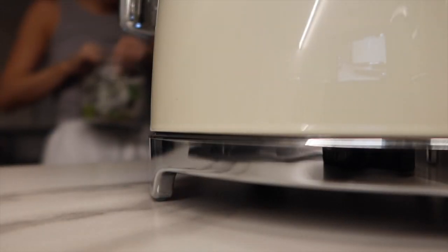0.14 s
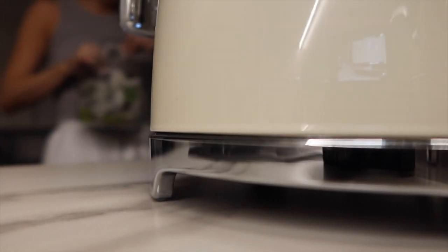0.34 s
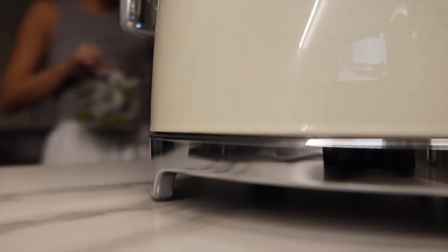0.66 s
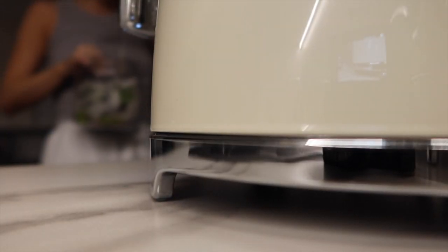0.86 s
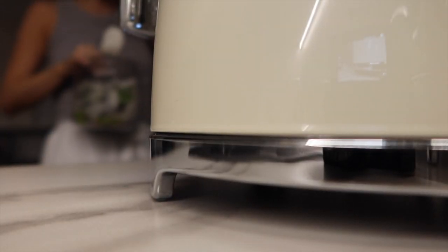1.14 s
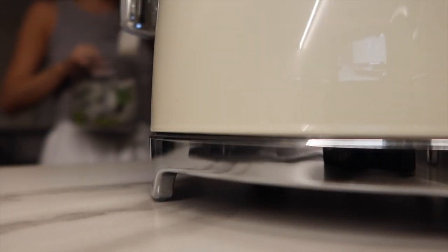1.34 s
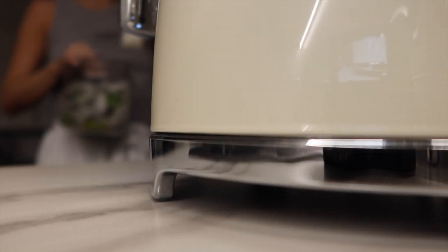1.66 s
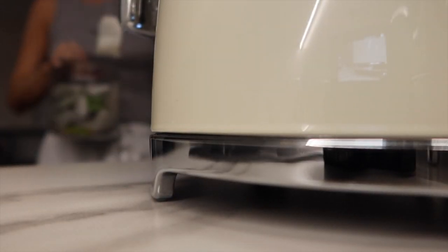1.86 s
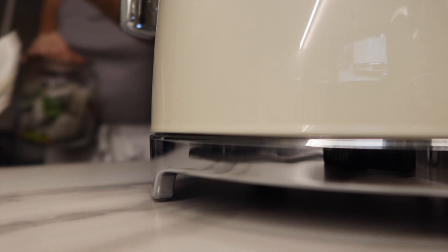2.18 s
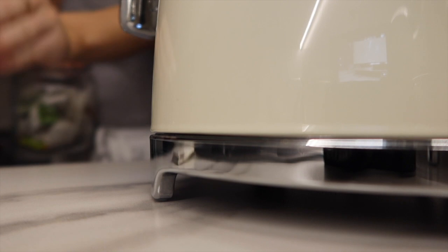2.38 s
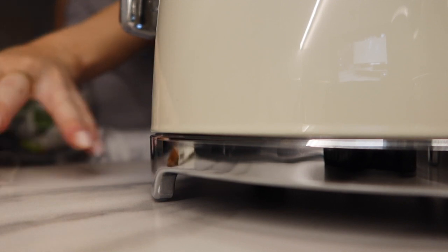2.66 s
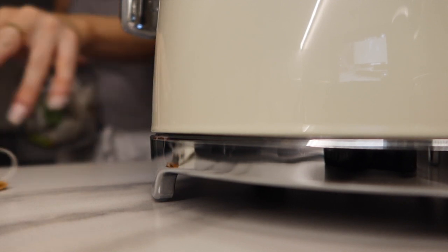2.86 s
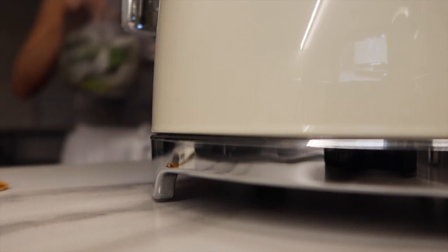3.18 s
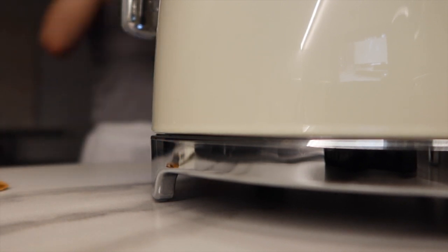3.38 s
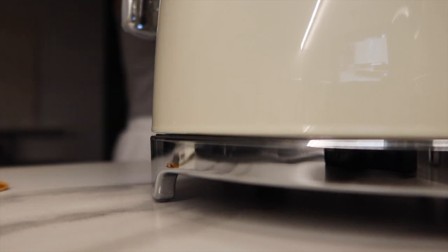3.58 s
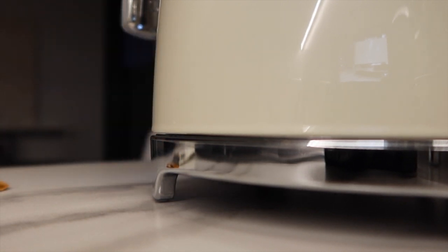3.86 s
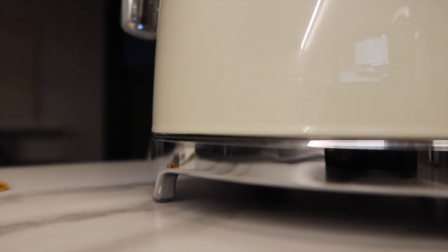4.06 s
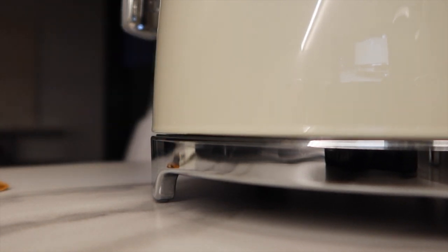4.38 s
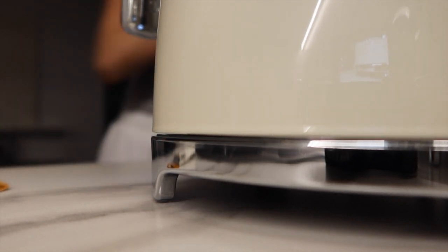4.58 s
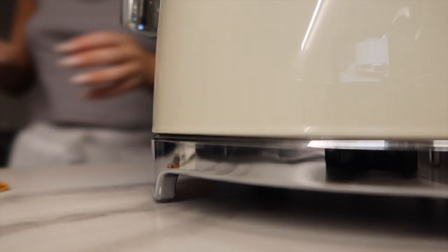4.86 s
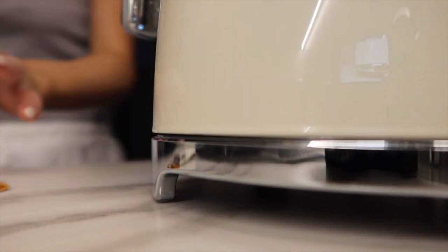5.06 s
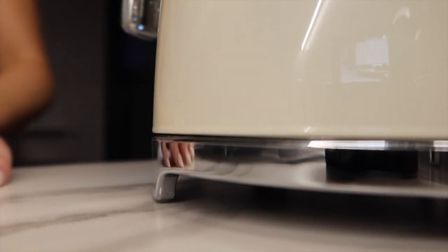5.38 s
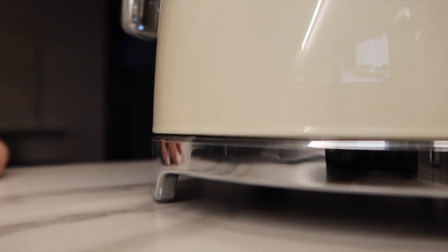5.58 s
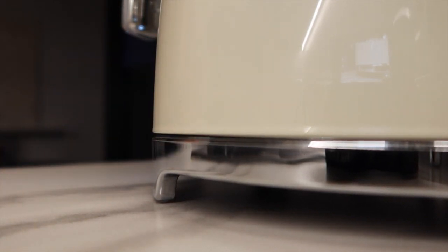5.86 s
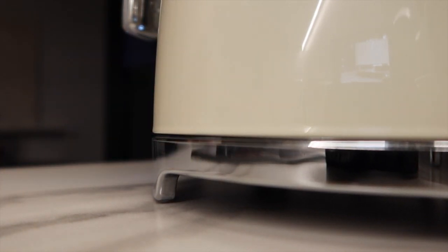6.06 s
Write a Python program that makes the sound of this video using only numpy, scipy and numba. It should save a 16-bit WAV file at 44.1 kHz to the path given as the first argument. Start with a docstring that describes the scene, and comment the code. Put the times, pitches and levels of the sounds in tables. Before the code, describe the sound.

An electric kettle heats water close to the microphone in a quiet, hard-walled kitchen. Its low, seething roar runs for the whole six seconds, with faint crackles and tiny pings against the steel wall. Right at the start, a thin glass gives a quick, ringing clink. Small dry ticks are scattered throughout, the clearest at about 0.4, 1.9 and 2.4 seconds. At about 4 seconds, a glass jar lands on a cupboard shelf with a loud clink, a thump and a brief rattle. Immediately afterward, around 4.2 seconds, the wooden door knocks shut and judders, with a short room echo. The roar dips briefly under these knocks. From 4.5 seconds, larger bubbles thud softly as the water nears the boil. Between about 5 and 6 seconds, a hand moves things nearby with faint rustles and a cluster of light taps, while the kettle keeps rumbling.

```python
"""An electric kettle roars towards the boil on a stone counter, close by in a quiet kitchen.
Steam bubbles collapse on the hot plate, shake the steel body and ping its wall. A thin glass clinks,
small things tick, a glass jar lands in a cupboard whose door knocks shut, and a hand rustles nearby.
The microphone's gain control ducks under the blows."""
import sys
import numpy as np
from scipy import signal
from scipy.fft import rfft, irfft, next_fast_len
from scipy.io import wavfile
from scipy.ndimage import uniform_filter1d, minimum_filter1d
from numba import njit

SR = 44100
rng = np.random.default_rng(int(sys.argv[2]) if len(sys.argv) > 2 else 0)


def waveform_to_disk(signal):
    """Save audio, clipped to [-1, 1], as 16-bit WAV at the path in sys.argv[1]."""
    frames = np.transpose(np.atleast_2d(signal))
    scaled = np.clip(frames, -1, 1) * 32767
    samples = np.round(scaled).astype(np.int16)
    wavfile.write(sys.argv[1], SR, samples)


N = 274369
TIME_S = np.arange(N) / SR


def undb(db):
    return 10 ** (np.asarray(db) / 20)


def at_rms(x, db):
    return x * undb(db) / np.sqrt(np.mean(x ** 2))


def butter(x, order, hz, kind="low"):
    return signal.sosfilt(signal.butter(order, hz, kind, fs=SR, output="sos"), x)


def band(x, hz, width_hz):
    """One resonance, unity gain at the centre."""
    return signal.lfilter(*signal.iirpeak(min(hz, .45 * SR), hz / width_hz, fs=SR), x)


def steep_band(x, hz, width_hz):
    return band(band(x, hz, width_hz), hz, width_hz)


def ring(x, modes):
    """Damped modes excited by x."""
    out = 0
    for hz, db, t60_s in modes:
        r, w = np.exp(-np.log(1000) / (t60_s * SR)), 2 * np.pi * hz / SR
        out = out + undb(db) * signal.lfilter([0, r * np.sin(w)], [1, -2 * r * np.cos(w), r * r], x)
    return out


def blows(hits, contact_ms):
    """A short rough force pulse at each (t/s, level/dB)."""
    force, n = np.zeros(N), max(int(contact_ms * SR / 1000), 2)
    for (s, db), rough in zip(hits, rng.standard_normal((len(hits), 256))):
        i = int(s * SR)
        force[i:i + n] += undb(db) * np.hanning(n + 2)[1:-1] * (1 + 0.16 * rough[:n]) * 2 / n
    return force


def wander(per_s):
    """Random steps, smoothed twice."""
    hold = int(SR / per_s)
    steps = np.repeat(rng.standard_normal(N // hold + 1), hold)
    return 1.08 * uniform_filter1d(uniform_filter1d(steps, hold), hold)[:N]


def clicks(per_s, scatter_db):
    """Random impulses of either sign, a few much larger than the rest; unit RMS."""
    chance, sign, size = rng.random((N, 3)).T
    height = undb(scatter_db * np.minimum(-np.log(1 - size), 6))
    return at_rms((chance < per_s / SR) * np.sign(sign - .5) * height, 0)


def swell(peak_s, db, rise_db_per_s, fall_db_per_s):
    t = TIME_S - peak_s
    return undb(db + np.where(t < 0, rise_db_per_s * t, -fall_db_per_s * t))


def minimum_phase(db):
    """Impulse response for a gain curve on an rfft grid."""
    cepstrum = irfft(db * np.log(10) / 20)
    half = len(cepstrum) // 2
    cepstrum[1:half] *= 2
    cepstrum[half + 1:] = 0
    return irfft(np.exp(rfft(cepstrum)))


# One collapse through water and base: f/Hz, level/dB
COLLAPSE_SPECTRUM = [(15, -72.5), (25, -39), (99, -14.5), (221, -5.5), (305, -0.5), (349, -7), (469, -13),
                     (536, -25), (647, -25.5), (781, -32.5), (1200, -36.5), (1950, -40), (2420, -43.5),
                     (13200, -76.5), (15500, -85.5)]
# Filled kettle: f/Hz, width/Hz, gain/dB
KETTLE_RESONANCES = [(102.6, 30, 5.5), (162, 29, 4.5), (260, 33, 2), (313, 44, 2.5), (384, 35, 5.5),
                     (464.7, 23.7, 7), (643, 33, 4), (1178, 220, 6), (1616, 320, 7.5), (1934, 71, 7),
                     (3900, 290, 3), (6100, 110, -2), (12000, 4600, 11)]


def kettle_body():
    """Response of the filled steel body to one bubble collapse."""
    hz = np.maximum(np.fft.rfftfreq(16384, 1 / SR), 1)
    knot_hz, knot_db = np.array(COLLAPSE_SPECTRUM).T
    db = np.interp(np.log(hz), np.log(knot_hz), knot_db)
    db += sum(gain / (1 + (2 * (hz - f) / width) ** 2) for f, width, gain in KETTLE_RESONANCES)
    return minimum_phase(np.maximum(db, -120))


# Bubble swarms, large to small: rate/(1/s), size scatter/dB, seethe/dB, seethe rate/(1/s)
SWARMS = [(2046, 1.5, 0.8, 16), (557.3, 2, -0.5, 22), (4000, 3, 1.18, 24), (4980, 1, 2.1, 32),
          (7200, 1.5, 2.2, 39)]
# Edges of the swarms' bands: f/Hz
SWARM_EDGES_HZ = [15, 170, 700, 2300, 6500, 16500]
# Biggest single bubbles: t/s, level/dB
BUBBLE_THUDS = [(4.513, -5), (4.66, -7), (4.875, -4.5), (4.912, -2.5), (5.063, -3), (5.128, -3),
                (5.227, 2.5), (5.274, -3), (5.308, -2), (5.426, -8), (5.705, -4), (5.882, -4.5)]


def kettle_roar(start_db=-14.5, sag_db_per_s=0.32, mid_sag_db_per_s=0.28, large_grow_db_per_s=1.79):
    """Swarms of collapses drive the body; near the boil the roar eases and large bubbles grow."""
    body, drive = kettle_body(), 0
    for k, (per_s, scatter_db, seethe_db, seethe_per_s) in enumerate(SWARMS):
        swarm = clicks(per_s, scatter_db)
        gain_db = seethe_db * (wander(seethe_per_s) + wander(seethe_per_s / 2))
        if k == 2:  # mid-sized bubbles fade faster
            gain_db -= mid_sag_db_per_s * (TIME_S - N / 2 / SR)
        drive += butter(swarm * undb(gain_db), 3, SWARM_EDGES_HZ[k:k + 2], "band")
    large_band_hz = SWARM_EDGES_HZ[1:3]
    large = clicks(per_s=60, scatter_db=1.8) * undb(-18.5 + large_grow_db_per_s * TIME_S)
    drive += butter(large, 3, large_band_hz, "band")
    roar = at_rms(signal.fftconvolve(drive, body)[:N], start_db) * undb(-sag_db_per_s * TIME_S)
    thud = butter(body, 3, large_band_hz, "band")
    thuds = signal.fftconvolve(blows(BUBBLE_THUDS, contact_ms=1.93), thud / np.abs(thud).max())[:N]
    return roar + thuds


def kettle_crackle():
    """Stray larger bubbles snap against the wall, each a short dull ping."""
    bands = [(1190, 130, -57), (2820, 200, -61), (4800, 390, -70), (9000, 4600, -78.5)]
    return sum(at_rms(band(clicks(50, 1.5), hz, width_hz), db) for hz, width_hz, db in bands)


# Hiss returning from all sides: f/Hz, width/Hz, level/dB
HISS_BANDS = [(35, 40, -77.5), (300, 300, -53.5), (1200, 1200, -72.5), (4000, 2000, -64),
              (5700, 1500, -73.5), (10500, 7000, -79.5)]


def diffuse_hiss(flicker_db=1.2):
    """Noise bands, each flickering on its own."""
    return sum(at_rms(steep_band(rng.standard_normal(N), hz, width_hz), db)
               * undb(flicker_db * wander(per_s=22)) for hz, width_hz, db in HISS_BANDS)


# Thin glass: f/Hz, level/dB, t60/s
GLASS_MODES = [(2140, -7, 0.13), (2200, -4, 0.25), (2250, -8.5, 0.14), (3500, -22.5, 0.092),
               (6330, -18, 0.14), (6380, -21.5, 0.09), (7420, -23, 0.092), (8200, -23.5, 0.05),
               (9450, -20.5, .04), (12380, -22, .05), (13050, -22.5, 0.055), (14590, -18, .05)]
# Blows on it: t/s, level/dB
GLASS_HITS = [(0.004, 3), (.044, -2), (.125, -5.5)]


def thin_glass(gain_db=-29.5):
    """Three weakening blows ring the glass, with a brief noisy shimmer."""
    shake = np.exp(-TIME_S / 0.036) * rng.standard_normal(N)
    force = blows(GLASS_HITS, contact_ms=.05) + 0.056 * shake
    shimmer = undb(-8) * band(shake, 10500, 7000)
    return undb(gain_db) * (ring(force, GLASS_MODES) + shimmer)


# Taps on counter and kettle: t/s, level/dB, f/Hz, relative overtone/dB, relative snap/dB
TAPS = [(0.408, -12, 3500, -7.5, -4.5), (0.4108, -29, 2280, -9, -16.5), (0.417, -40, 3600, -10, -5.5),
        (0.581, -26.5, 1970, -8, -14.5), (0.847, -29, 1170, -7.5, -21.5), (1.3988, -25, 1000, -7, -24.5),
        (1.712, -40.5, 4600, -10, -13.5), (1.843, -38.5, 3700, -12.5, -15), (1.933, -10.5, 3400, 1, -6.5),
        (1.9352, -16, 2280, -5.5, -22), (2.3075, -38.5, 3040, -13.5, 7), (2.429, -17.5, 1190, -3, -32),
        (2.7197, -36, 3400, -6.5, 7), (2.8116, -21.5, 1590, -13.5, -29), (3.619, -23.5, 2800, 4, -10),
        (4.435, -23, 1000, -5, -23.5), (4.518, -28, 1207, -10, -25), (4.576, -38.5, 4500, -15, 3.5),
        (5.1943, -25, 1420, -7.5, -26), (5.258, -37.5, 2900, -16, -25), (5.2766, -28.5, 2620, -10, -32),
        (5.328, -29.5, 2640, -12, 18.5), (5.336, -39, 5000, -15, 21.5), (5.394, -25, 2860, -19.5, -24),
        (5.396, -24.5, 1000, -5.5, -26), (5.605, -20.5, 1150, 2, -21), (5.607, -28.5, 2800, -6, -13),
        (5.66, -25.5, 2330, -17, -29.5), (5.716, -44, 3400, -17, -24), (5.793, -32, 2700, -15.5, -10),
        (5.833, -35.5, 3500, -12, -14), (5.979, -32, 2400, -13, -25), (6.086, -27, 1220, -10, -15)]


def ticks(faint_count=36, ring_cycles=43, smear_s_per_db=0.0028, snap_t60_s=0.0089):
    """Dry taps plus faint random ones: a noise band, its overtone, a bright snap and a glassy ring."""
    faint = [(when * N / SR, -41.5 + 2 * (2 * size - 1), 2800 * 2 ** (pitch - .5), -16.5, -21)
             for when, size, pitch in rng.random((faint_count, 3))]
    n = 4096
    out, t = np.zeros(N + n), np.arange(n) / SR
    for s, db, hz, overtone_db, snap_db in TAPS + faint:
        noise = rng.standard_normal(n)
        softer_db = max(-11 - db, 0)  # fainter, further taps smear longer and ring duller
        t60_s = ring_cycles / hz + smear_s_per_db * softer_db
        contact = 3.2 * np.sqrt(2) * np.sin(2 * np.pi * hz * t) * (hz * t < 1)  # one clean cycle
        push = (noise + contact) * undb(-60 * t / t60_s) * np.minimum(t / 0.00058, 1)
        tone = band(band(push, hz, 0.5 * hz), hz, 0.31 * hz)
        tone += undb(overtone_db) * steep_band(push, 1.67 * hz, 0.24 * hz)
        snap = band(band(noise, 12000, 5100), 13500, 7000) * undb(snap_db - 60 * t / snap_t60_s)
        glassy = np.sin(2 * np.pi * 5760 * t) * undb(-31 - 2 * softer_db - 60 * t / .1)
        i = int(s * SR)
        out[i:i + n] += undb(db) * (tone / np.abs(tone).max() + snap + glassy)
    return out[:N]


# Single bubbles on the steel wall: t/s, level/dB, f/Hz
WALL_PINGS = [(.679, -44, 2900), (1.362, -36.5, 2940), (1.843, -29.5, 2900), (2.088, -42, 2900),
              (2.506, -32.5, 2270), (2.811, -45, 4800), (2.956, -40, 2930), (3.045, -39.5, 2960),
              (3.268, -32.5, 2930), (3.428, -42.5, 3780), (3.541, -40.5, 2980), (4.837, -33, 2270),
              (5.065, -40, 2400)]


def kettle_pings(t60_s=.035, attack_s=.0012):
    """Each bubble rings the wall on one clear pitch."""
    n = 4096
    out, t = np.zeros(N + n), np.arange(n) / SR
    for s, db, hz in WALL_PINGS:
        envelope = undb(db - 60 * t / t60_s) * np.minimum(t / attack_s, 1)
        i = int(s * SR)
        out[i:i + n] += envelope * np.sin(2 * np.pi * hz * t)
    return out[:N]


# Glass jar: f/Hz, level/dB, t60/s
JAR_MODES = [(783, 4, 0.04), (1034, -7.5, 0.031), (1550, -7.5, 0.057), (2138, -2.5, 0.082),
             (2165, -4.5, 0.045), (3247, -5, 0.11), (3204, -6, 0.052), (3960, -2.5, 0.029),
             (4060, -13, .03), (4340, -15, 0.033), (4570, -22.5, .04), (5000, -22.5, 0.05),
             (5100, -20.5, 0.091), (2660, -18.5, .03), (3600, -17.5, .03), (6800, -42, 0.032)]
# Jar landing and rocking: t/s, level on glass/dB, level on shelf/dB
JAR_CONTACTS = [(3.9600, -14, 4), (3.9632, 14.5, 3.5), (3.9672, 12.5, 5), (3.974, -10, 14), (4.039, 5, -8),
                (4.051, -6, -13), (4.083, -7, -15.5), (4.101, -9.5, -5.5)]
# Lid and contents: peak t/s, level/dB, rise/(dB/s), fall/(dB/s)
JAR_RATTLES = [(4.055, -24, 149.5, 302.5), (4.09, -29.5, 298.5, 180), (4.24, -43.5, 150, 84)]


def jar(scrape_s=0.00085):
    """The jar clinks down and its lid and contents rattle; each contact scrapes briefly."""
    force = blows([(s, db) for s, db, _ in JAR_CONTACTS], contact_ms=.08)
    landed = TIME_S > JAR_CONTACTS[0][0]
    force += landed * sum(swell(*row) for row in JAR_RATTLES) * clicks(1500, 1.7)
    energy = signal.lfilter([1], [1, -np.exp(-1 / (scrape_s * SR))], force ** 2)
    noise = rng.standard_normal(N) * np.sqrt(energy)
    scrape = 0.17 * steep_band(noise, 2800, 3900) + 0.017 * band(noise, 8900, 9000)
    return 0.096 * ring(force, JAR_MODES) + scrape


# Shelf and door: f/Hz, level/dB, t60/s
WOOD_MODES = [(127, -6.5, 0.13), (260, -8, 0.052), (344, 4.5, 0.042), (482, 5.5, 0.019), (606, 0, 0.044),
              (820, -9.5, 0.044), (978, -3.5, 0.034), (1060, -18, 0.0089), (1550, -21, 0.033),
              (1926, -8.5, 0.012), (2440, -19, 0.026)]
# Cupboard under the jar's weight: f/Hz, level/dB, t60/s
BOOM_MODES = [(115, -8, 0.079), (79, -28, 0.1)]
# Door shutting: t/s, level/dB
DOOR_KNOCKS = [(4.125, -4.5), (4.183, 4.5), (4.197, -4), (4.212, -7.5), (4.226, -5), (4.242, -1.5),
               (4.258, -7.5), (4.3, -11)]


def cupboard():
    """The jar punches the shelf and booms; the wooden door knocks shut and judders."""
    judder = swell(peak_s=4.2, db=-29, rise_db_per_s=600, fall_db_per_s=109.5)
    judder *= band(clicks(900, 3.2), 830, 2400)
    landing = blows([(s, db) for s, _, db in JAR_CONTACTS], contact_ms=0.46)
    force = landing + blows(DOOR_KNOCKS, contact_ms=0.26) + judder
    burst = rng.standard_normal(4000) * np.exp(-np.arange(4000) / 500)
    thud = band(signal.fftconvolve(force, burst)[:N], 510, 900)
    wood = butter(0.34 * ring(force, WOOD_MODES) + 0.7 * thud, 2, [130, 2600], "band")
    punch = undb(15.5) * band(landing, 302, 130)
    boom = band(ring(landing, BOOM_MODES), 110, 110)
    return wood + punch + boom


# Hand moving things close by: peak t/s, level/dB, rise/(dB/s), fall/(dB/s)
HAND_MOVES = [(4.95, -50, 122, 198.5), (5.28, -55, 201, 199), (5.41, -46.5, 201, 149),
              (5.615, -49, 499, 198.5), (5.84, -51.5, 150, 198)]


def rustle():
    """Soft dense crackle of fingers and paper."""
    return sum(swell(*row) for row in HAND_MOVES) * band(clicks(2500, 2.5), 3200, 3500)


def room(x, low_t60_s=0.56, treble_t60_s=0.38):
    """Hard kitchen walls: a noise tail whose treble dies first and carries most of the width."""
    t, noise = np.arange(SR) / SR, rng.standard_normal((3, SR))
    low = butter(noise[0], 1, 2500) * undb(-60 * t / low_t60_s)
    side = .1 * noise[2] + 1.5 * butter(noise[2], 3, 3200, "high")
    bright = .5 * (noise[1] + np.array([side, -side])) * undb(-60 * t / treble_t60_s)
    tail = (low + bright) * np.minimum(t / 0.00053, 1)
    tail = butter(tail, 3, 11000)  # air and soft things absorb the top
    return signal.fftconvolve(x[None], tail / np.sqrt(np.sum(tail[0] ** 2)), axes=1)[:, :N]


# Left microphone port: f/Hz, lag/samples
LEFT_PORT_LAG = [(300, 1.1), (1500, .75), (3000, .4), (5000, 1.15), (9000, 1.5), (14000, 1.33)]


def port_delay(x, pad=512):
    """Sound reaches the left port slightly late, by a lag that varies with frequency."""
    size = next_fast_len(N + 2 * pad)
    hz = np.fft.rfftfreq(size, 1 / SR)
    knot_hz, knot_lag = np.array(LEFT_PORT_LAG).T
    lag_s = np.interp(np.log(hz + 1), np.log(knot_hz), knot_lag) / SR
    spectrum = rfft(np.pad(x, pad, "reflect"), size)
    return irfft(spectrum * np.exp(-2j * np.pi * hz * lag_s), size)[pad:N + pad]


def scene():
    """Stereo mix: kettle dry, small sounds with a little room, glass and cupboard with more."""
    kettle = (kettle_roar() + kettle_crackle() + kettle_pings()) * undb([[-.2], [.2]])
    small = ticks() + rustle()
    far = jar() + cupboard() + thin_glass()
    mix = kettle + small + far + room(undb(-16.5) * small + undb(-7) * far)
    mix[0] = port_delay(mix[0])
    hiss = diffuse_hiss()
    return mix + np.array([hiss, -hiss])


@njit
def duck_gain(peak, threshold, slope, attack_s, release_s):
    """Gain that falls as the envelope exceeds the threshold."""
    gain, envelope = np.empty(len(peak)), threshold
    for i in range(len(peak)):
        envelope += (peak[i] - envelope) / (SR * (attack_s if peak[i] > envelope else release_s))
        gain[i] = min(threshold / envelope, 1.) ** slope
    return gain


def record(dry):
    """Stereo-linked slow gain control, late ducker and look-ahead limiter, then a steep top cut."""
    late_s, limiter_samples, top_hz = 0.016, 161, 15400
    slow = duck_gain(np.abs(dry).max(0), threshold=0.33, slope=0.66, attack_s=0.034, release_s=.9)
    x = dry * slow
    quick = duck_gain(np.abs(x).max(0), threshold=0.37, slope=1.08, attack_s=0.0041, release_s=0.037)
    x *= np.roll(uniform_filter1d(quick, 300), int(late_s * SR))
    limit = np.minimum(1.05 / (np.abs(x).max(0) + 1e-9), 1)
    x *= uniform_filter1d(minimum_filter1d(limit, limiter_samples), limiter_samples)
    top_cut = signal.ellip(8, .2, 70, top_hz, fs=SR, output="sos")
    return np.clip(signal.sosfilt(top_cut, x), -1, 1)


dry = scene()
out = record(dry)
waveform_to_disk(out)
```